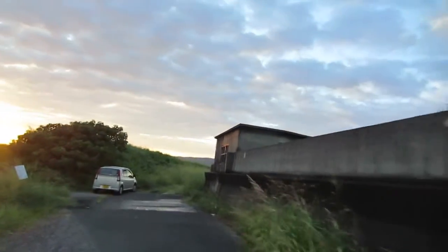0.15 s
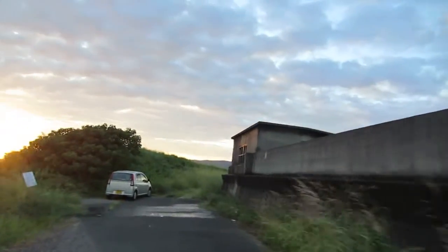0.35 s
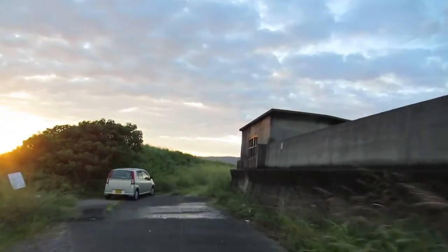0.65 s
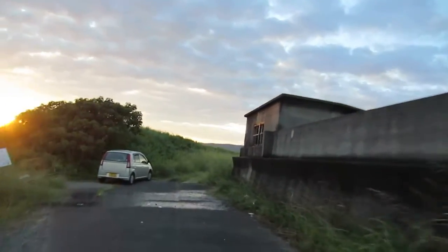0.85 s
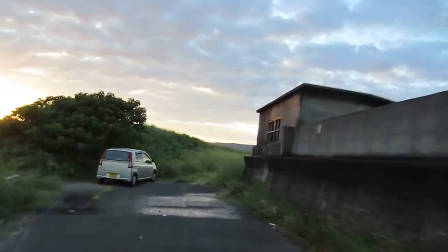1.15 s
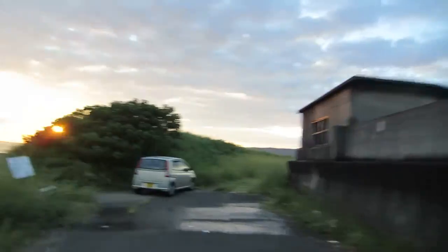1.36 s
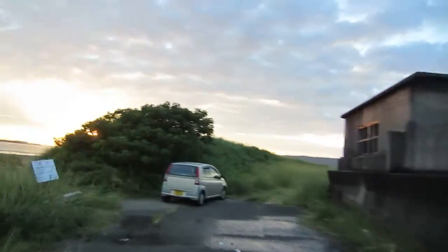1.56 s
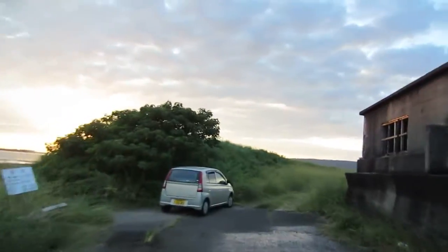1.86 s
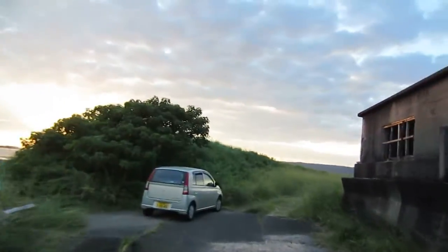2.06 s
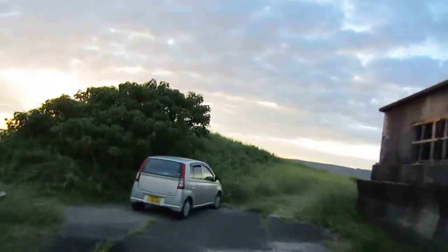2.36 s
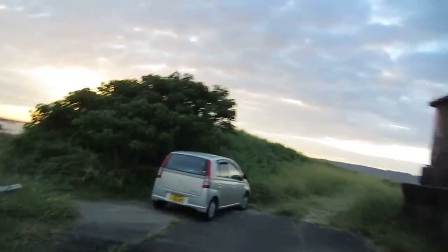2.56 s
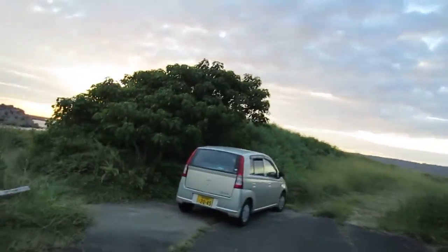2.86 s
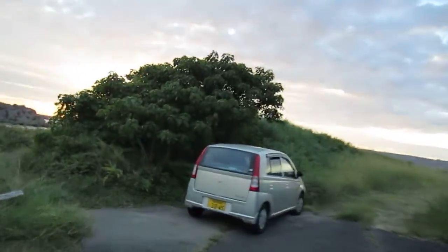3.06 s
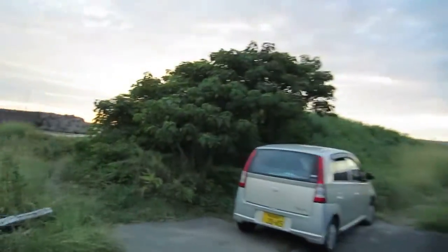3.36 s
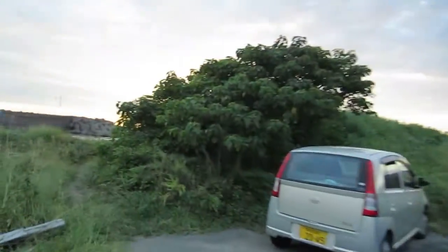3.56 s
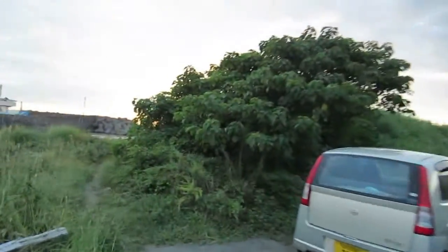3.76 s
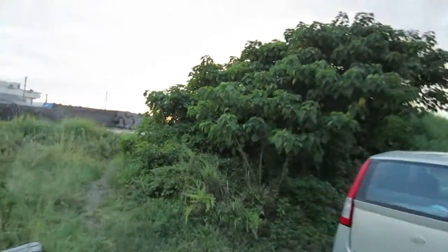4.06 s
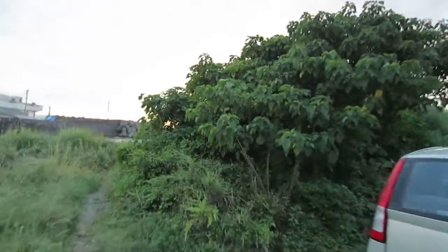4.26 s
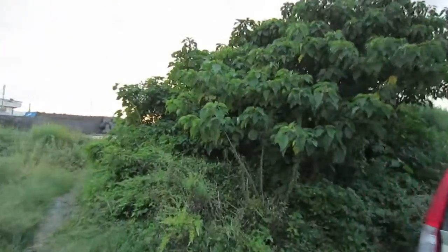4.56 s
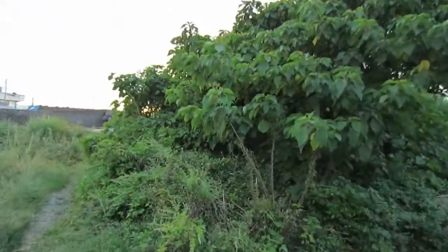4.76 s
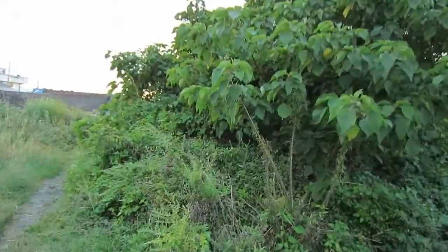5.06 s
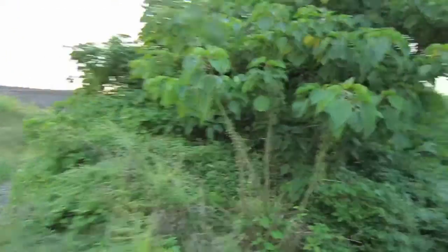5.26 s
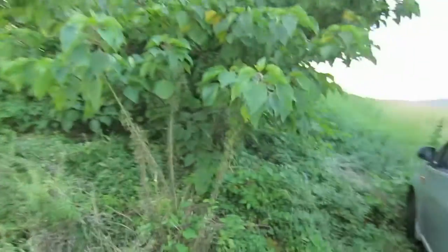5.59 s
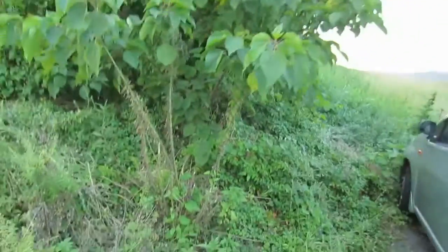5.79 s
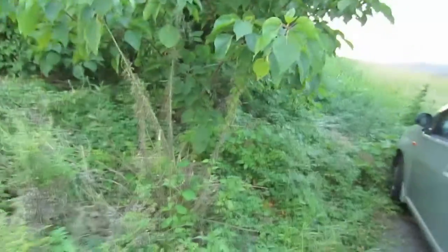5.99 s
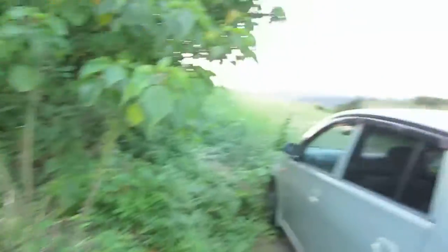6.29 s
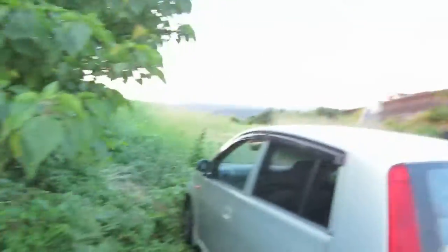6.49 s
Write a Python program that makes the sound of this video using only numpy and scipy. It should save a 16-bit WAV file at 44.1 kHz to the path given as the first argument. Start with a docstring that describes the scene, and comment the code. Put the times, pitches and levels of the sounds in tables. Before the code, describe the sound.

Bicycle brakes squeal in long, piercing, gliding notes with short squeaks and thin whistles, over wind buffeting, tyre scuffs and loose rattling on a rough lane.

```python
"""Bicycle brakes squeal on a rough lane in long gliding notes, with short squeaks and thin high whistles of other modes.
Each note is a sine driven by a wandering phase; moving echoes off road and wall make it flutter.
Around it are shaped noise and struck resonances: wind and jolts on the microphone, loose parts rattling,
tyre and shoe scuffing the ground, insects hissing in the grass and the far hum of the shore.
The sound cuts out once for an instant."""
import sys
import numpy as np
from scipy import signal
from scipy.fft import rfft, irfft
from scipy.io import wavfile
from scipy.ndimage import uniform_filter1d

SR = 44100
rng = np.random.default_rng(int(sys.argv[2]) if len(sys.argv) > 2 else 0)


def wav_record(signal):
    """Record a signal, one row per channel, as 16-bit PCM in the file named by sys.argv[1]."""
    frames = np.transpose(np.atleast_2d(signal))
    bounded = np.clip(frames, -1, 1)
    # unit amplitude maps onto the largest positive 16-bit level
    quanta = np.round(bounded * 32767).astype(np.int16)
    wavfile.write(sys.argv[1], SR, quanta)


N = 292467
TIME = np.arange(N) / SR


# squeals of the main brake mode: start [t/s], end [t/s], level under a light pad [level/dB],
# octave before its trim [level/dB]
SQUEALS = [(0.03, 0.076, -53, -66), (0.083, 0.257, -36.5, -54.5), (0.424, 0.669, -32.5, -44.5),
           (0.68, 0.712, -28.5, -47), (0.751, 1.344, -30, -39.5), (1.835, 3.111, -27, -39),
           (3.943, 4.003, -35, -49), (4.045, 5.493, -27, -34.5)]
# pitch of the long squeals before the lever is let go, one list per squeal: time [t/s], pitch [f/Hz]
LONG_GLIDES = [
    [(0.755, 4560), (0.819, 4636), (0.943, 4720), (0.983, 4613), (1.089, 4777), (1.135, 4800), (1.29, 5040)],
    [(1.84, 4559), (1.89, 4714), (1.976, 4711), (2.266, 5022), (2.316, 4940), (2.42, 4786), (2.454, 4648),
     (2.54, 4543), (2.792, 4747), (2.892, 4732), (3.04, 4607)],
    [(4.04, 4507), (4.062, 4550), (4.14, 4717), (4.166, 4880), (4.298, 4970), (4.72, 4976), (4.802, 5045),
     (5.006, 5202), (5.254, 5192), (5.336, 5086), (5.43, 5150)],
]
# pitch of the brief squeals, likewise: time [t/s], pitch [f/Hz]
BRIEF_GLIDES = [
    [(0.08, 4560), (0.104, 4627), (0.23, 4459)],
    [(0.42, 4623), (0.52, 4625), (0.63, 4475)],
    [(0.68, 4465), (0.71, 4590)],
    [(3.94, 4480), (3.984, 4480), (3.99, 4580)],
]
# faint inharmonic lines heard with a high squeal: ratio to its pitch,
# sine amplitude relative to the squeal level [level/dB]
FAINT_LINES = [(1 / 2, -32.5), (3 / 5, -42.5), (5 / 7, -41.5), (3 / 2, -45), (3 / 10, -48.5),
               (5 / 12, -43.5), (2 / 3, -47)]
LIGHT_HZ, FULL_HZ = 4440, 4943   # pitch under a light pad, and where the squeal reaches full strength
PRESSURE_DB, PRESSURE_CURVE = 9.5, 1.48   # gain from light to full pressure, most of it near the top
LET_GO_S = 0.065   # the pitch sags back as the lever is let go
FADE_S, FADE_DB = 0.12, 4   # each squeal weakens towards its end
OCTAVE_TOP_HZ, OCTAVE_LOSS_DB_PER_HZ = 10290, 0.03   # the octave weakens above this
LINES_FROM_HZ, LINES_RISE_HZ = 4866, 130   # the faint lines enter above this squeal pitch, over this range


def squeal(octave_db=-1, third_db=-27, throb_db=2.17, throb_rate=18, edge_s=0.02):
    """Pad pressure raises pitch and loudness of the main mode together; a light pad sings less steadily."""
    points = np.vstack(LONG_GLIDES + BRIEF_GLIDES)
    pitch, = in_time(points[np.argsort(points[:, 0])])
    level, octave, grip = 0, 0, 0
    for start, end, db, overtone_db in SQUEALS:
        fade = np.clip(1 - (end - TIME) / FADE_S, 0, 1)
        on = held(start, end, edge_s) * from_db(-FADE_DB * fade)
        level = level + on * from_db(db)
        octave = octave + on * from_db(overtone_db + octave_db)
        grip = grip + (on > 0) * np.clip((end - TIME) / LET_GO_S, 0, 1)
    pitch = LIGHT_HZ + (pitch - LIGHT_HZ) * np.minimum(grip, 1)

    pressure = np.clip((pitch - LIGHT_HZ) / (FULL_HZ - LIGHT_HZ), 0, 1)
    level = level * from_db(PRESSURE_DB * pressure ** PRESSURE_CURVE) * lumpy(throb_db, throb_rate)
    octave_loss_db = OCTAVE_LOSS_DB_PER_HZ * np.maximum(2 * pitch - OCTAVE_TOP_HZ, 0)
    octave = octave * from_db(-octave_loss_db) * lumpy(throb_db, throb_rate)

    phase = stick_slip(pitch, jitter=0.003 + 0.0025 * (1 - pressure), jitter_rate=50)
    tone = outdoors(phase, level, echo_db=-3.5, tail_db=-10.5, tail_s=0.3)
    tone = tone + outdoors(2 * phase, octave, echo_db=-11.5, tail_db=-4, tail_s=0.31)
    third = octave * from_db(third_db)
    tone = tone + outdoors(3 * phase, third, echo_db=-6.5, tail_db=-5.5, tail_s=0.2)

    # faint inharmonic lines come and go while the squeal's pitch is high
    lines_level = level * np.clip((pitch - LINES_FROM_HZ) / LINES_RISE_HZ, 0, 1)
    for ratio, line_db in FAINT_LINES:
        wander = 3 * drift(3) + 0.7 * drift(44)   # radians
        flecks = lumpy(6, rate=4) * np.sin(ratio * phase + wander)
        tone = tone + lines_level * from_db(line_db) * flecks
    return tone


# short squeaks of higher modes: start [t/s], end [t/s], first and last pitch [f/Hz],
# first and last level before gain_db [level/dB]
SQUEAKS = [(0.0, 0.1, 6065, 6140, -40, -35.5), (0.248, 0.272, 7800, 7760, -55, -35),
           (0.29, 0.435, 6040, 6144, -28.5, -26.5), (0.642, 0.657, 7800, 7700, -38, -35),
           (0.672, 0.705, 6110, 6090, -23, -45), (1.748, 1.83, 6130, 6260, -24.5, -33)]


def squeaks(gain_db=2.0, octave_db=-32, throb_db=2.5):
    """A higher mode of the brake sings for a moment, with a faint octave."""
    pitch, level = slides(SQUEAKS, edge_s=0.033)
    level = level * from_db(gain_db) * lumpy(throb_db, rate=31)
    phase = stick_slip(pitch, jitter=0.005, jitter_rate=110)
    tone = outdoors(phase, level, echo_db=-14.0, tail_db=-11.5, tail_s=0.34)
    return tone + level * from_db(octave_db) * np.sin(2 * phase)


# thin rough whistles: start [t/s], end [t/s], first and last pitch [f/Hz],
# first and last level before gain_db [level/dB]
WHISTLES = [(0.708, 0.85, 9580, 9620, -39, -52), (1.36, 1.58, 9210, 9350, -44.5, -50),
            (1.6, 1.77, 9220, 9360, -37, -32), (3.105, 3.15, 9300, 9200, -31.5, -29),
            (3.16, 3.735, 9190, 9187, -36.5, -31.5), (3.745, 4.06, 9250, 9400, -27.5, -29)]


def whistles(gain_db=-1.0, throb_db=0.5):
    """A barely touching pad excites a very high, grainy mode."""
    pitch, level = slides(WHISTLES, edge_s=0.004)
    level = level * from_db(gain_db) * lumpy(throb_db, rate=14)
    phase = stick_slip(pitch, jitter=0.008, jitter_rate=110)
    return outdoors(phase, level, echo_db=-5.5, tail_db=-5.5, tail_s=0.12)


def stick_slip(pitch, jitter, jitter_rate):
    """Phase of a friction-driven mode, its pitch shaken by the uneven rim (jitter: fraction of the pitch)."""
    return 2 * np.pi * np.cumsum(pitch * (1 + jitter * drift(jitter_rate))) / SR


def outdoors(phase, level, echo_db, tail_db, tail_s, count=6):
    """A tone with near echoes, whose changing paths make it flutter, and a tail scattered by wall and bushes."""
    tone = np.exp(1j * phase)
    heard = tone
    delays_s, swings_s = rng.uniform(0.003, 0.022, count), rng.uniform(-0.004, 0.004, count)
    for delay, swing in zip(delays_s, swings_s):
        path = delay + swing * np.sin(TIME + rng.uniform(0, 2 * np.pi))
        heard = heard + from_db(echo_db) * np.exp(1j * np.interp(TIME - path, TIME, phase))
    # keep the flutter, but hold the average power over 60 ms
    heard = heard / np.sqrt(uniform_filter1d(np.abs(heard) ** 2, int(0.06 * SR)) + 1e-6)
    scatter = rng.standard_normal(SR) * from_db(-60 * TIME[:SR] / tail_s)
    tail = signal.fftconvolve(level * tone.real, scatter / np.linalg.norm(scatter))[:N]
    return np.sqrt(2) * (level * heard.real + from_db(tail_db) * tail)


def far_echo(x, delay_s=0.37, spread_s=0.17, echo_db=-35):
    """The sea wall sends back a late echo, smeared to both sides of its delay."""
    scatter = rng.standard_normal(SR) * np.exp(-np.abs(TIME[:SR] - delay_s) / spread_s)
    return from_db(echo_db) * signal.fftconvolve(x, scatter / np.linalg.norm(scatter))[:N]


# gusts on the microphone: start [t/s], length [t/s], low rumble [level/dB], crackle before hard_db [level/dB]
GUSTS = [(0.0, 0.11, -26, -15.5), (0.317, 0.14, -35.5, -44), (0.71, 0.016, -29, -40),
         (0.805, 0.027, -33, -45), (0.892, 0.22, -35, -48), (1.075, 0.04, -31, -24),
         (1.13, 0.069, -27, -16), (1.253, 0.2, -37, -27.5), (1.527, 0.046, -29.5, -25.5),
         (1.907, 0.025, -41, -38.5), (2.111, 0.14, -34.5, -30.5), (2.304, 0.17, -40.5, -55),
         (2.898, 0.34, -40.5, -56), (3.112, 0.24, -32.5, -39), (3.395, 0.26, -27, -27.5),
         (3.694, 0.64, -30, -47), (4.305, 0.027, -21, -22), (4.396, 0.072, -25, -29),
         (4.852, 0.091, -35.5, -43), (5.141, 0.082, -38.5, -52), (5.355, 0.03, -37, -53),
         (5.595, 0.019, -39, -40.5), (5.717, 0.1, -34.5, -58), (5.964, 0.023, -38.5, -46)]
# colour of the low rumble: frequency [f/Hz], relative density [level/dB per Hz]
SOFT_WIND = [(12, -23), (20, 3.5), (65, 3.5), (128, -2), (304, -21.5), (455, -39.5), (500, -33),
             (650, -57.5), (1100, -120)]
# colour of the crackle before its low cut: frequency [f/Hz], relative density [level/dB per Hz]
HARD_WIND = [(12, -34.5), (20, -15), (143, 3), (356, -4), (648, -13.5), (795, -18), (852, -22),
             (912, -18.5), (1200, -29), (1560, -54.5), (2640, -120)]
BREEZE_DB = -47.5   # steady air on the microphone
GUST_ATTACK_S, GUST_RELEASE_S = 0.031, 0.022


def wind(hard_db=-1, gust_cut_hz=85):
    """Eddies on the microphone: large ones rumble, small ones striking it head-on crackle."""
    soft = swells([(s, length, db) for s, length, db, _ in GUSTS], GUST_ATTACK_S, GUST_RELEASE_S)
    hard = swells([(s, length, db) for s, length, _, db in GUSTS], GUST_ATTACK_S, GUST_RELEASE_S)
    soft = np.hypot(soft, from_db(BREEZE_DB) * lumpy(3.6, rate=6))
    rumble = noise(SOFT_WIND) * lumpy(2.3, rate=44)
    crackle = rms_one(butter(noise(HARD_WIND) * lumpy(5.5, rate=75), gust_cut_hz, "high"))
    return butter(soft * rumble + hard * from_db(hard_db) * crackle, 15, "high")


# jolts of the microphone: start [t/s], peak before gain_db [level/dB], ring [f/Hz]
THUMPS = [(1.109, -11, 172), (1.124, -3, 160), (1.368, -12.5, 263), (1.533, -8.5, 310), (2.185, -15.5, 197),
          (4.875, -22, 110), (4.935, -14, 104.3), (5.724, -16, 140), (5.745, -17.5, 135)]


def thumps(gain_db=-1, width_hz=100):
    """Each jolt sets the microphone housing swinging for a cycle or two."""
    out = np.zeros(N)
    for s, db, hz in THUMPS:
        kick = bursts([s], [0], decay_s=0.001)
        swing = butter(resonate(kick, hz, width_hz), 1.2 * hz, "low")
        out += from_db(db + gain_db) * swing / np.abs(swing).max()
    return out


# tyre and shoe scuffing the ground: start [t/s], length [t/s], rub [level/dB], gritty rasp [level/dB]
SCUFFS = [(0.0, 0.1, -24, -55), (1.889, 0.15, -28.5, -37.5), (2.065, 0.043, -23.5, -30),
          (2.566, 0.11, -24, -34), (2.692, 0.59, -28, -41), (2.944, 0.031, -22.5, -40),
          (3.275, 0.081, -27.5, -52), (3.452, 0.024, -27.5, -47), (3.527, 0.026, -24.5, -39),
          (3.608, 0.04, -30, -51), (3.707, 0.016, -33, -58), (4.447, 0.03, -24, -28),
          (6.147, 0.074, -39.5, -67)]
# tyres rolling: time [t/s], level before roll_db [level/dB]
ROLL = [(0.15, -51), (0.75, -37), (1.25, -49), (1.5, -57.5), (2.0, -44), (2.4, -53), (3.1, -44),
        (3.8, -43.5), (5.1, -49), (6.1, -44.5), (6.63, -47.5)]
# colours of rub, rasp, rolling and gravel: frequency [f/Hz], relative density [level/dB per Hz]
SCUFF_COLOUR = [(88, -40), (150, -23.5), (236, -8.5), (312, -3.5), (416, -2.5), (649, 0), (866, -3.5),
                (1290, -10), (1500, -24), (1950, -48), (3300, -120)]
RASP_COLOUR = [(820, -13.5), (1400, 5.5), (1580, 2.5), (2190, -3), (2790, -7.5), (3530, -18.5), (4200, -21),
               (5460, -50.5), (9240, -120)]
ROLL_COLOUR = [(180, -22.5), (300, -4), (566, -6), (618, -3), (704, -6.5), (2400, -17), (3120, -33.5),
               (5280, -120)]
SPRAY_COLOUR = [(4000, -3), (8500, -5.5), (11000, -19.5), (15000, -29)]
SCUFF_ATTACK_S, SCUFF_RELEASE_S = 0.017, 0.012
SPRAY_AT_S, SPRAY_S, SPRAY_DB, SPRAY_RELEASE_S = 3.25, 0.12, -49, 0.33   # fine gravel hisses under the tyre


def ground(roll_db=-2, per_s=260, size_db=5.5):
    """Rubber drags over grit in quick uneven catches; tyres roll softly beneath and throw up fine gravel once."""
    rub = swells([(s, length, db) for s, length, db, _ in SCUFFS], SCUFF_ATTACK_S, SCUFF_RELEASE_S)
    rasp = swells([(s, length, db) for s, length, _, db in SCUFFS], SCUFF_ATTACK_S, SCUFF_RELEASE_S)
    at = np.flatnonzero(rng.random(N) < per_s / SR)
    sizes_db = np.clip(rng.normal(0, size_db, len(at)), -12, 9)
    catches = rms_one(bursts(at / SR, sizes_db, decay_s=0.0019) + 0.8)
    friction = rub * noise(SCUFF_COLOUR) + rasp * noise(RASP_COLOUR)
    scuffing = butter(catches * friction, 4600, "low", order=3)
    spray = swells([(SPRAY_AT_S, SPRAY_S, SPRAY_DB)], SCUFF_ATTACK_S, SPRAY_RELEASE_S)
    gravel = spray * catches * noise(SPRAY_COLOUR)
    roll, = in_time(ROLL)
    rolling = from_db(roll + roll_db) * noise(ROLL_COLOUR) * lumpy(2, rate=59)
    return scuffing + gravel + rolling


# ringing parts of the bicycle: frequency [f/Hz], width [f/Hz], relative level [level/dB]
FRAME = [(1010, 39, -5), (1265, 8.1, 9.5), (1520, 17, 1.5), (1723, 47, -1.5), (2220, 100, -3),
         (2863, 38, -2), (3040, 29, -4), (3335, 37, -5), (3555, 13, 3)]


def ring_frame(x):
    """Resonances of the metal parts side by side, in alternating polarity."""
    modes = enumerate(FRAME)
    return sum((-1) ** k * from_db(db) * resonate(x, hz, width) for k, (hz, width, db) in modes)


# shaking of the bicycle on the rough lane: time [t/s], level before shake_db [level/dB]
SHAKE = [(0.15, -64.5), (0.35, -45.5), (0.92, -39.5), (1.55, -62), (2.12, -42.5), (2.6, -72), (3.0, -51),
         (3.42, -33.5), (3.75, -52.5), (4.36, -41), (4.8, -53), (5.9, -66), (6.25, -51.5), (6.63, -67)]
# knocks of mudguard and frame: start [t/s], strength before knock_db [level/dB],
# low body relative to that strength, before body_db [level/dB]
KNOCKS = [(0.152, -37, -7), (0.2935, -31.5, -15), (0.544, -26.5, -13), (0.572, -16.5, -26),
          (0.587, -21.5, -28), (0.6486, -22.5, -31), (0.8055, -28.5, -20), (0.8764, -31, -22),
          (0.9334, -29.5, -30), (0.9852, -30, -3), (3.2339, -24.5, 7), (3.2882, -25, 12.5),
          (3.327, -22.5, -13), (3.3403, -17.5, 7.5), (3.3686, -18, 8), (3.4351, -41, -10), (3.47, -30, -2),
          (3.5298, -24.5, 16), (3.6066, -25, 3), (3.691, -34, 15), (3.709, -29, -4), (3.7536, -36, 8),
          (3.8841, -34.5, -16), (4.466, -17.5, -21), (5.5806, -32, 6), (5.8643, -32, 4), (5.934, -33.5, 1),
          (6.022, -44, 13)]
# how freely the loose metal rings: time [t/s], level [level/dB]
RINGING = [(0, 2), (1.1, -2), (1.4, -25), (6.63, -18.5)]
# colour of the gritty contact: frequency [f/Hz], relative density [level/dB per Hz]
GRIT = [(350, -37.5), (600, -5.5), (725, -16), (819, -29.5), (935, -1.5), (1540, -6), (2200, -1.5),
        (4040, -14), (4570, -8.5), (4830, -11.5), (8500, -23), (11000, -57.5), (18700, -120)]


def rattle(shake_db=-1, knock_db=-5, grit_db=-1, body_db=-7, decay_s=0.0096, per_s=110):
    """Loose parts chatter over the bumps: each contact is a gritty crack that rings the frame."""
    shake, = in_time(SHAKE)
    ring_db, = in_time(RINGING)
    s, db, low_db = np.transpose(KNOCKS)
    small = np.flatnonzero(rng.random(N) < per_s / SR)
    chatter = rms_one(bursts(small / SR, rng.normal(0, 4.4, len(small)), decay_s=0.0018) + 0.35)
    force = from_db(shake + shake_db) * chatter + bursts(s, db + knock_db, decay_s)
    white = rng.standard_normal(N)
    # scaled by what steady white noise would give
    frame = from_db(ring_db) * ring_frame(force * white) / np.std(ring_frame(white))
    grit = from_db(grit_db) * force * noise(GRIT)
    body_force = bursts(s, db + low_db + body_db, decay_s=0.0083)
    body_band = [250, 1000]   # Hz
    body = butter(body_force * white, body_band, "band") / np.std(butter(white, body_band, "band"))
    return butter(frame + grit + body, 12000, "low", order=6)


# hiss of the insects in the grass: time [t/s], level before insect_db [level/dB]
INSECTS = [(0.0, -65), (0.9, -58), (1.45, -70), (2.1, -61), (2.9, -63.5), (3.6, -58), (4.7, -54),
           (6.0, -51), (6.63, -51)]
# colour of the insect chorus: frequency [f/Hz], relative density [level/dB per Hz]
GRASS = [(3000, -17.5), (3800, -23.5), (4250, -4.5), (4700, -34), (5600, -15.5), (6450, -8.5),
         (6750, -14.5), (7000, -4.5), (7250, -9), (8300, -3), (9050, -7), (9700, -18.5), (11500, -39),
         (14500, -27)]
# colour of the far hum: frequency [f/Hz], relative density [level/dB per Hz]
FAR = [(15, -23.5), (25, 0), (65, 2.5), (137, -11), (449, -16), (672, -16.5), (2210, -25.5), (3450, -33.5),
       (4000, -24.5), (5200, -52), (8800, -120)]


def meadow(insect_db=1, far_db=-51):
    """A wavering hiss for the chorus of insects, over steady low-weighted noise for the far hum of the shore."""
    level, = in_time(INSECTS)
    insects = from_db(level + insect_db) * noise(GRASS) * lumpy(0.96, rate=40)
    return insects + from_db(far_db) * noise(FAR)


def from_db(db):
    """Decibels to gain."""
    return 10 ** (np.asarray(db) / 20)


def rms_one(x):
    """Scale to unit power."""
    return x / np.sqrt(np.mean(x ** 2) + 1e-20)


def in_time(rows):
    """Each column of a curve at every sample; the first column is t/s."""
    s, *columns = np.transpose(rows)
    return [np.interp(TIME, s, c) for c in columns]


def butter(x, hz, kind, order=2):
    """Causal Butterworth filter."""
    sections = signal.butter(order, np.clip(hz, 10, 0.45 * SR), kind, fs=SR, output="sos")
    return signal.sosfilt(sections, x + 1e-18)


def resonate(x, hz, width):
    """A resonance with gain 1 on top; hz and width in Hz."""
    r = np.exp(-np.pi * width / SR)
    poles = [1, -2 * r * np.cos(2 * np.pi * hz / SR), r * r]
    return signal.lfilter(np.array([1, 0, -1]) * (1 - r * r) / 2, poles, x + 1e-18)


def drift(rate):
    """Smooth chance with spread 1: noise through two equal poles at rate Hz, made on every 40th sample."""
    r = np.exp(-80 * np.pi * rate / SR)
    white = rng.standard_normal(N // 40 + 2002)
    slow = signal.lfilter([1], [1, -2 * r, r * r], white)[2000:]   # skip the run-in
    return np.interp(np.arange(N) / 40, np.arange(len(slow)), rms_one(slow))


def lumpy(depth_db, rate):
    """A random gain of unit power."""
    return rms_one(from_db(depth_db * np.clip(drift(rate), -2, 2)))


def noise(spectrum):
    """Noise of a given colour, falling 20 dB per octave beyond its ends; rms 1."""
    hz, db = np.transpose(spectrum)
    octave = np.log2(np.maximum(np.arange(N // 2 + 1) * SR / N, 1))
    known = np.log2(hz)
    outside = np.abs(octave - np.clip(octave, known[0], known[-1]))
    gain = from_db(np.interp(octave, known, db) - 20 * outside)
    return rms_one(irfft(rfft(rng.standard_normal(N)) * gain, N))


def bursts(times, levels_db, decay_s):
    """Envelope that jumps at each time and dies away."""
    kicks = np.zeros(N)
    at = np.round(np.asarray(times) * SR).astype(int)
    kicks[np.clip(at, 0, N - 1)] = from_db(levels_db)
    return signal.lfilter([1], [1, -np.exp(-1 / (decay_s * SR))], kicks + 1e-18)


def held(start, end, edge_s):
    """1 while the pad sings, with soft edges."""
    return np.clip(np.minimum(TIME - start, end - TIME) / edge_s + 0.5, 0, 1)


def slides(notes, edge_s):
    """Pitch and level of notes that each slide evenly from their first to their last values."""
    pitch, level = np.full(N, float(notes[0][2])), 0
    for start, end, first_hz, last_hz, first_db, last_db in notes:
        along = np.clip((TIME - start) / (end - start), 0, 1)
        pitch = np.where(TIME > start - edge_s / 2, first_hz + (last_hz - first_hz) * along, pitch)
        level = level + held(start, end, edge_s) * from_db(first_db + (last_db - first_db) * along)
    return pitch, level


def swells(rows, attack_s, release_s):
    """Envelope of (start, length, dB) events: each rises, holds and dies away; their powers add."""
    power = 0
    for start, length, db in rows:
        rise = np.clip((TIME - start) / attack_s + 1, 0, 1)   # full at the start time
        fall = np.exp(-np.clip((TIME - start - length) / release_s, 0, 20))
        power = power + (from_db(db) * rise * fall) ** 2
    return np.sqrt(power)


def scene():
    """Brakes, wind, bicycle and meadow at one microphone."""
    brakes = squeal() + squeaks() + whistles()
    echo = far_echo(butter(brakes, 4500, "low", order=4))   # air takes the top off the long path
    return (brakes + echo + wind() + thumps() + ground() + rattle() + meadow())[None]


DROPOUT_START_S, DROPOUT_END_S = 4.593, 4.657
CUTOFF_HZ = 15900


def record(dry, dropout_db=-29):
    """The level drops abruptly for an instant; a steep low-pass cuts the top."""
    dropped = (TIME > DROPOUT_START_S) & (TIME < DROPOUT_END_S)
    gain = uniform_filter1d(np.where(dropped, from_db(dropout_db), 1), size=6)
    low_pass = signal.ellip(10, 0.1, 90, CUTOFF_HZ, fs=SR, output="sos")
    return signal.sosfilt(low_pass, dry * gain)


dry = scene()
out = record(dry)
wav_record(out)
```